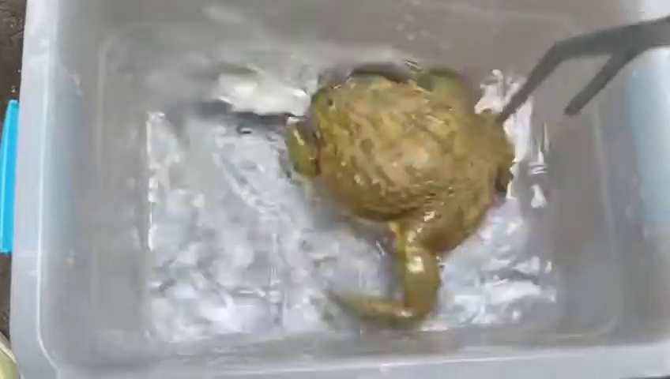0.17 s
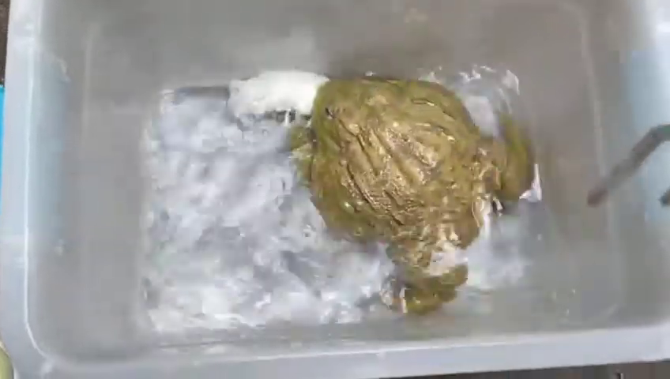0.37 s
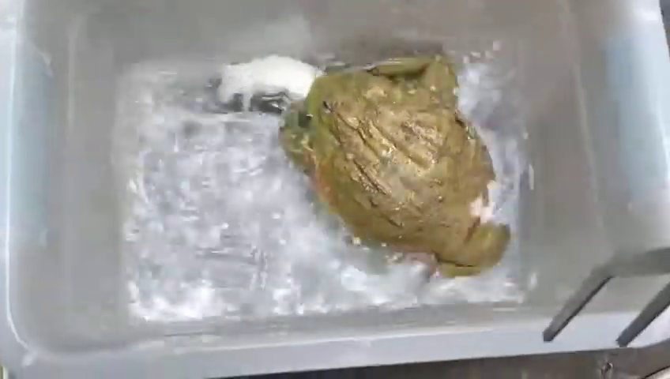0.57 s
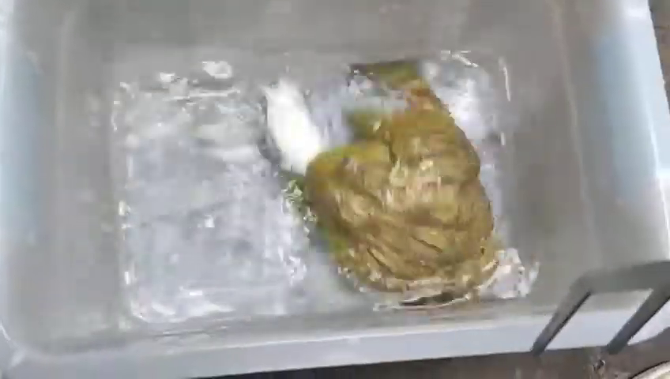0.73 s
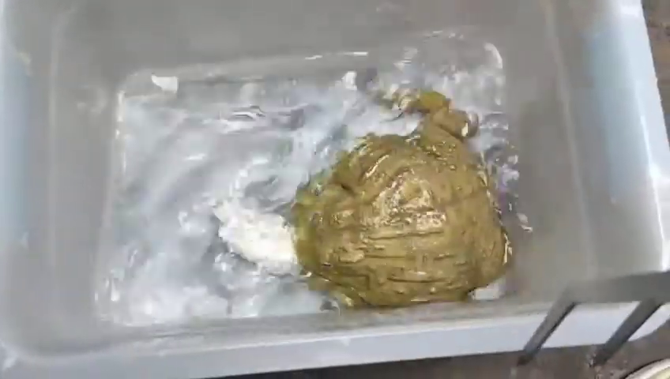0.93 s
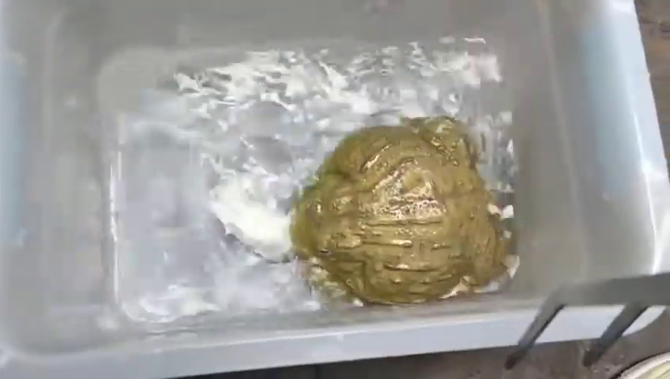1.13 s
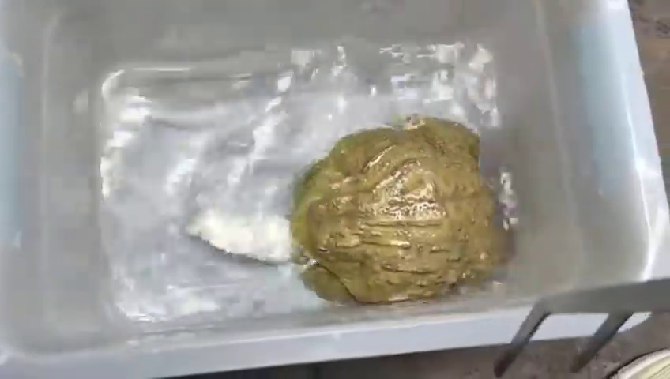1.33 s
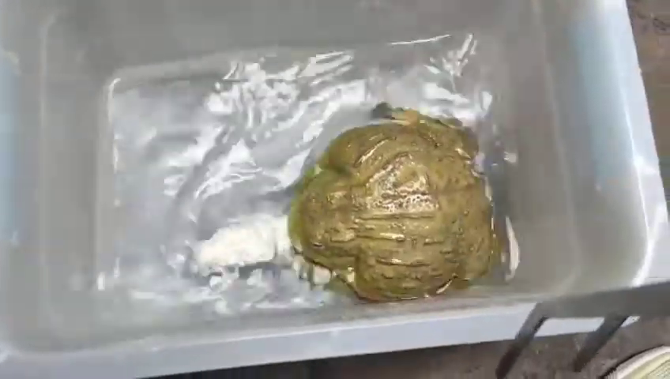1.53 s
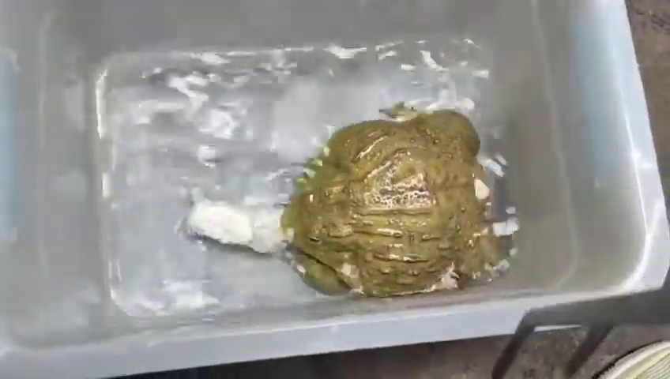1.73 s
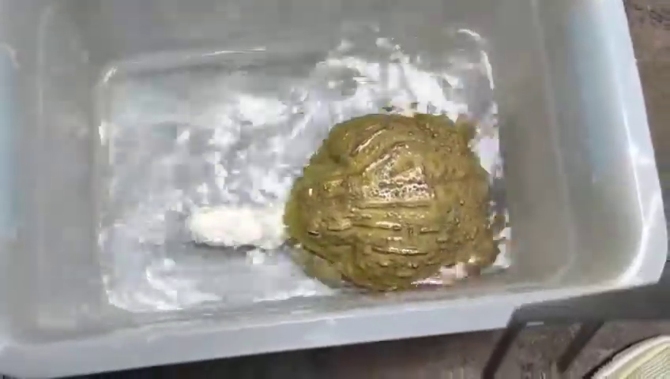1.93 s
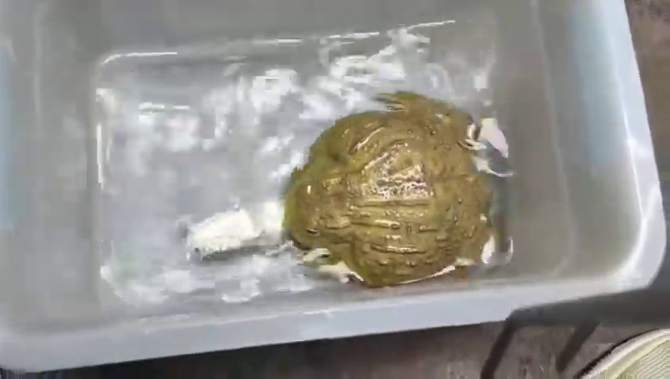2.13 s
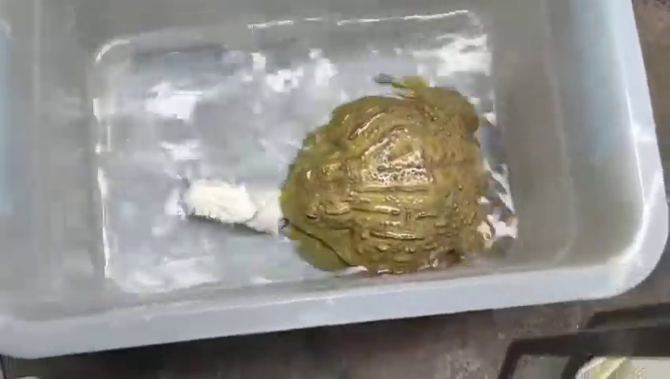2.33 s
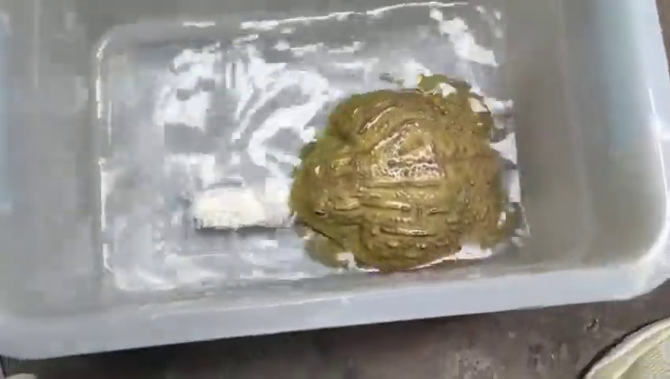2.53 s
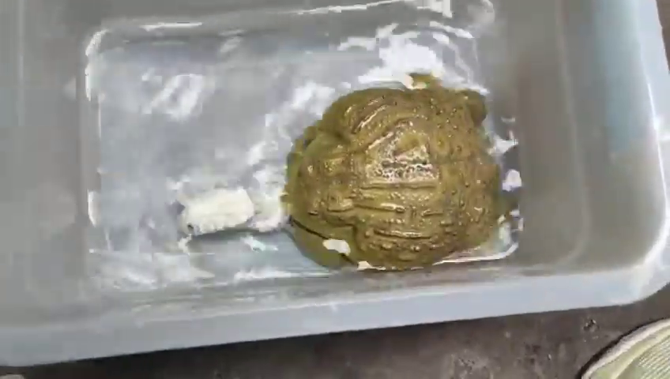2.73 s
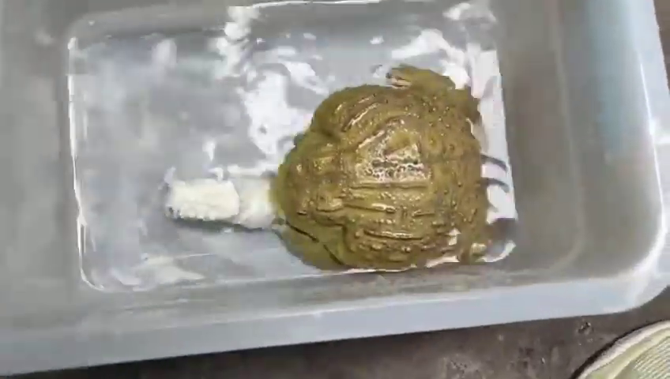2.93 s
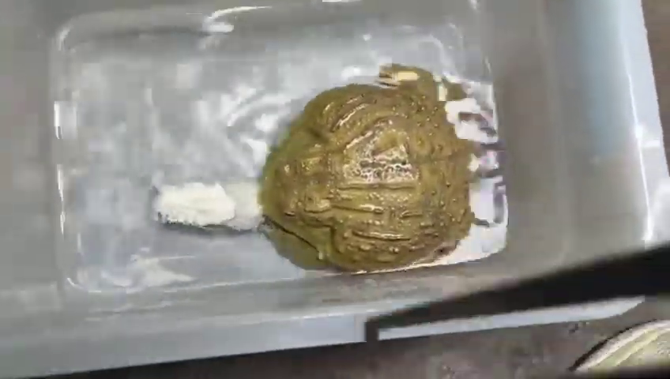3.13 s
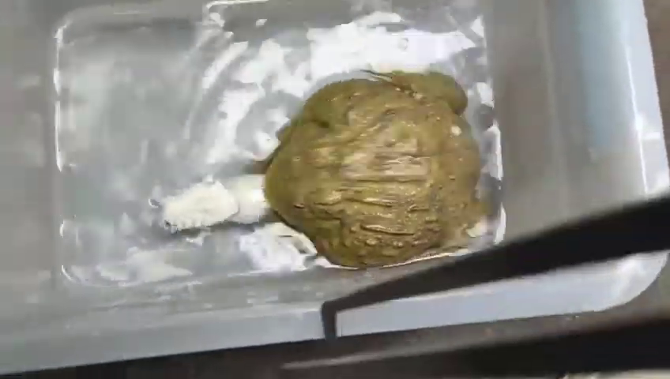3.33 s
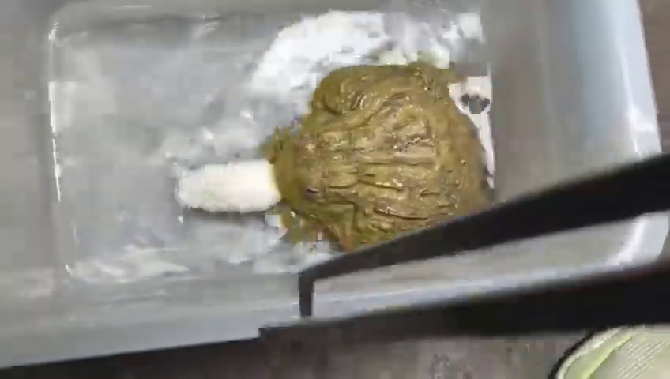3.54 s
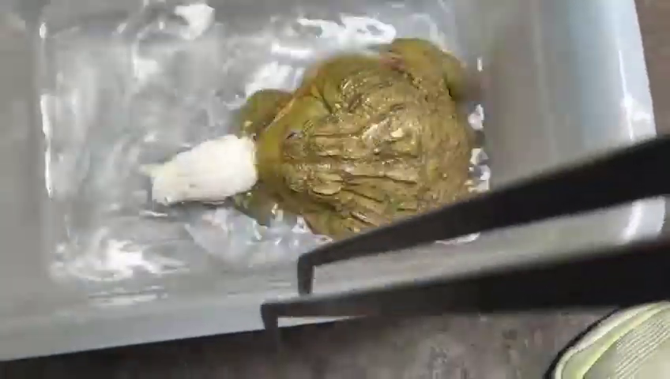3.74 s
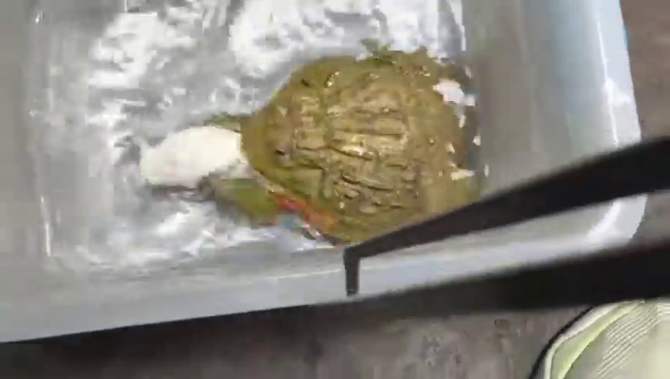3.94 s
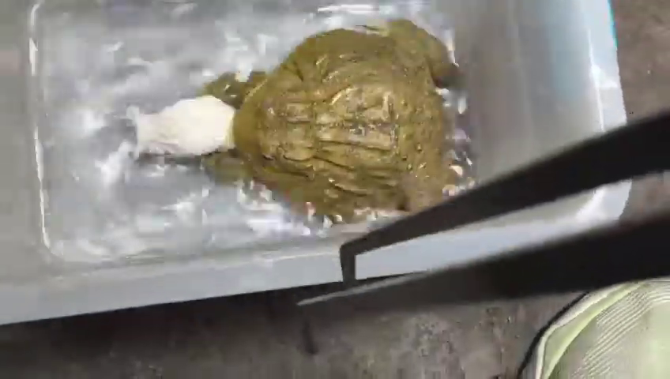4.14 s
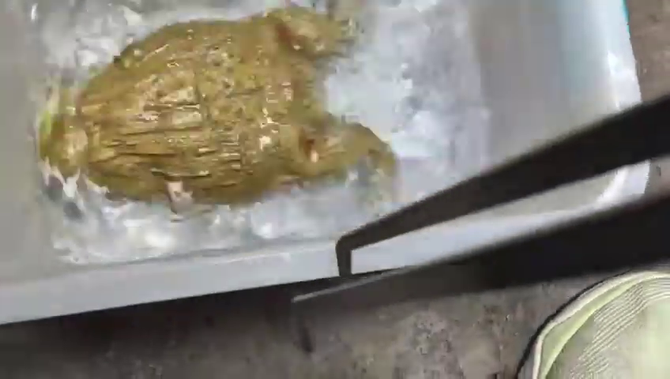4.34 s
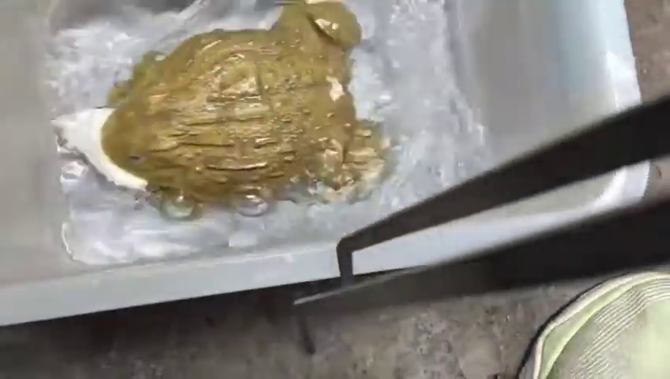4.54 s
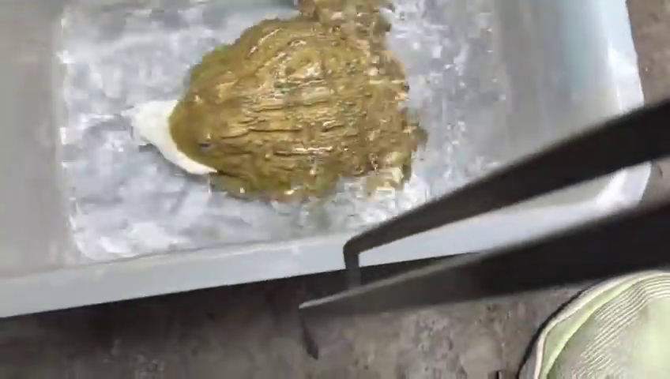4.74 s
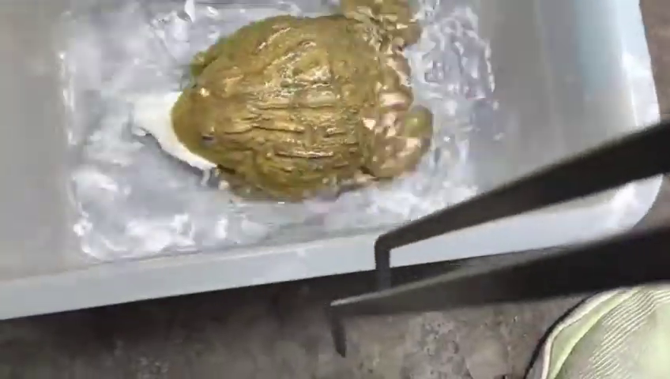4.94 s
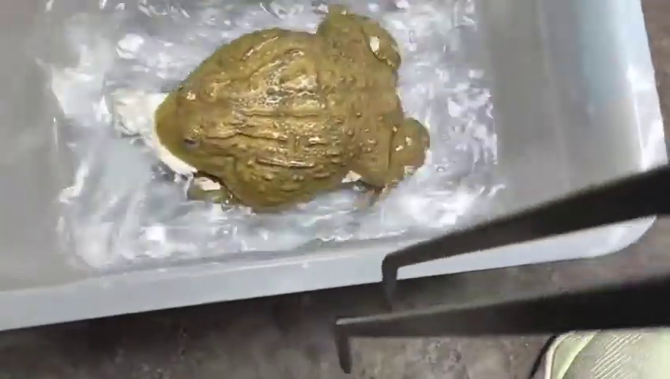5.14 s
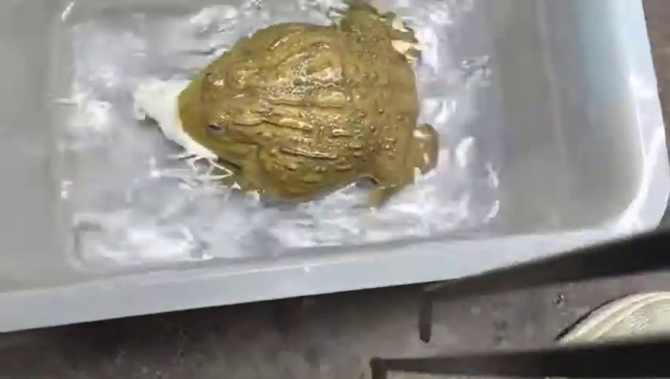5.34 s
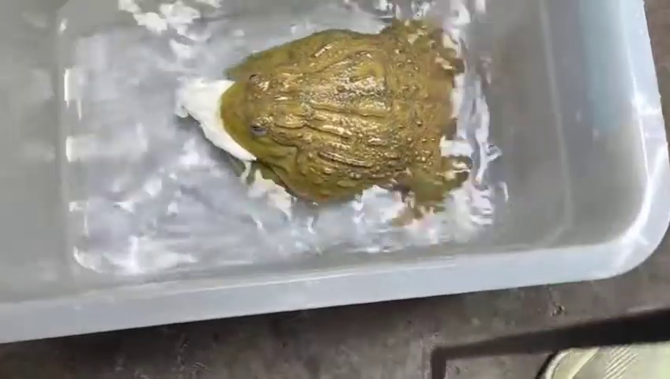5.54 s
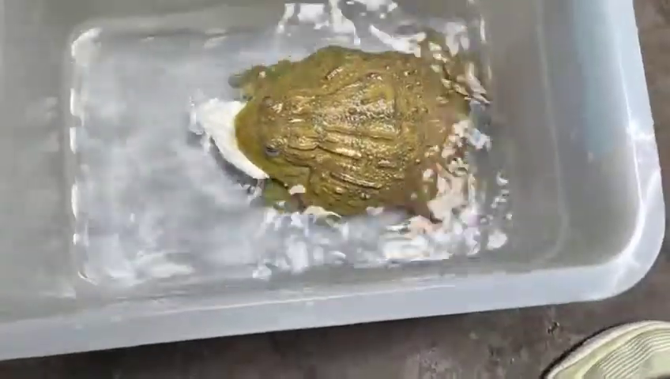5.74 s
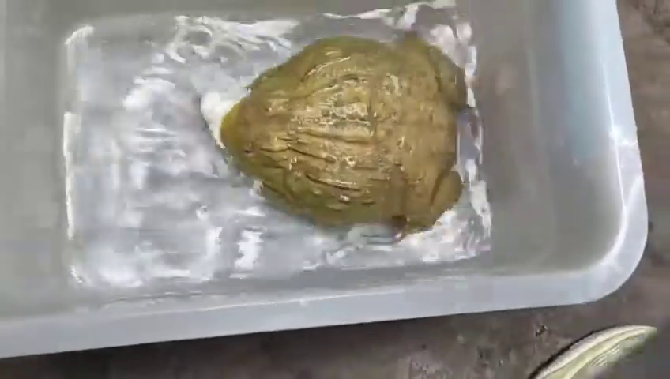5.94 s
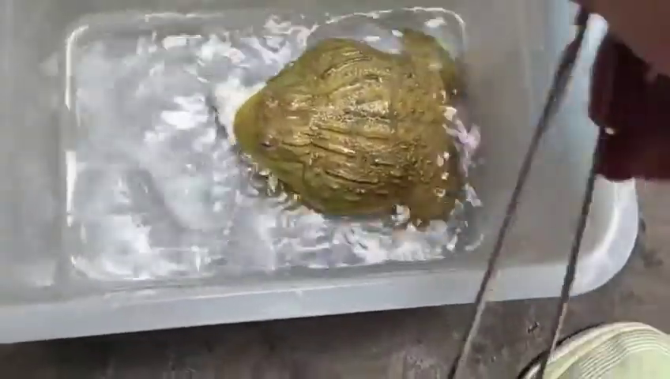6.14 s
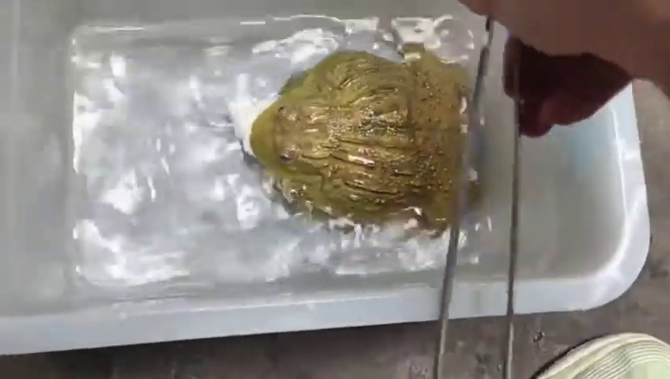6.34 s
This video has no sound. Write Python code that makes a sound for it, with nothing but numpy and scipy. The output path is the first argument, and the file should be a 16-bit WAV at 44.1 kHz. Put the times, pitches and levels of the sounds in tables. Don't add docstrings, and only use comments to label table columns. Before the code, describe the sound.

Close wet slaps, spray and bubbling plops in a plastic tub, a near-silent lull, then one hard splashing snap and scattered drips.

```python
import sys
import numpy as np
from scipy import signal
from scipy.fft import rfft, irfft, next_fast_len
from scipy.io import wavfile
from scipy.ndimage import uniform_filter1d, minimum_filter1d, map_coordinates

SR = 44100
rng = np.random.default_rng(int(sys.argv[2]) if len(sys.argv) > 2 else 0)


def field_ratio(decibels):
    return 10 ** (np.asarray(decibels, dtype=float) / 20)


def master(y):
    cut = np.clip(np.atleast_2d(y).T, -1, 1)
    pcm = np.round(cut * 32767)
    wavfile.write(sys.argv[1], SR, pcm.astype(np.int16))


N = 286209

# start in seconds, hold in seconds, level in dB,
# fine mist relative to it in dB.
SPLASHES = [(.117, 0.14, -52.5, -5), (.3, 0.065, -45, -3.5), (.36, 0.1, -54, 3), (.44, 0.13, -54.5, -6),
            (.53, 0.034, -80, -4), (.6, 0.11, -66.5, 3), (.642, 0.0079, -54.5, -11),
            (.72, 0.041, -75.5, 16.5), (.848, 0.076, -58.5, -4), (2.943, 0.0097, -55.5, -14),
            (3.113, 0.02, -68, 12.5), (3.159, 0.0093, -41, 3.5), (3.175, 0.045, -47.5, 0),
            (3.232, 0.015, -50.5, 2), (3.327, 0.011, -39, -10.5), (3.35, 0.063, -58.5, -9),
            (3.732, 0.036, -56, -8), (4.25, .05, -63, -23), (4.305, 0.02, -47.5, -20),
            (4.33, 0.015, -37.5, -4.5), (4.37, 0.016, -43, -3), (4.395, 0.028, -39, -6),
            (4.462, 0.023, -40, -1), (4.51, 0.13, -41.5, -6.5), (4.655, 0.1, -54.5, 2),
            (4.86, 0.06, -55, -0.5), (4.95, 0.12, -72.5, 13), (5.11, 0.095, -66, 0.5),
            (5.25, 0.024, -56.5, -7.5), (5.94, 0.036, -51, -2.5), (6.01, 0.087, -52.5, 1),
            (6.085, 0.094, -59.5, -6), (6.18, 0.055, -54.5, 0)]
# start in seconds, hold in seconds, level in dB,
# rub on the tub wall relative to it in dB.
WAVES = [(.117, 0.092, -61, 4.5), (.292, 0.036, -46, -2), (.335, 0.091, -56, -4.5), (.65, 0.028, -61, -11),
         (.71, 0.0092, -83.5, 28.5), (.79, 0.067, -68.5, 13.5), (.855, 0.0093, -51.5, -9),
         (1.17, 0.017, -67, -9), (3.328, 0.021, -49, 1), (3.345, 0.02, -64.5, 14.5),
         (4.33, 0.015, -45, 3.5), (4.37, 0.061, -42, 1), (4.46, 0.028, -36, -23), (4.505, 0.028, -49, 10),
         (4.55, 0.081, -39, -6.5), (4.66, 0.017, -56, -21), (4.72, 0.056, -51.5, -7),
         (4.85, 0.17, -83.5, 20.5), (5.22, 0.11, -70.5, 7.5), (5.94, 0.016, -50.5, -7),
         (5.98, 0.13, -59.5, 3.5), (6.1, 0.35, -69.5, 9)]
# time in seconds, level in dB.
RIPPLES = [(0, -67.5), (.3, -63.5), (1.1, -63), (1.4, -70), (1.62, -68.5), (1.85, -75.5), (2.7, -76),
           (3.1, -68), (3.5, -67.5), (4.2, -77.5), (4.8, -57.5), (5.1, -67), (5.35, -75), (5.9, -70),
           (6.3, -68), (6.49, -69)]
# frequency in Hz, density in dB per Hz.
SPRAY_COLOUR = [(1060, -14), (1800, -8.5), (2090, -0.5), (2540, -0.5), (3020, -0.5), (3950, 4), (5570, 4),
                (8000, -3), (10400, -66), (17600, -120)]
# frequency in Hz, density in dB per Hz.
MIST_COLOUR = [(3820, -48), (6500, 0), (9640, 4.5), (11800, 3.5), (14400, 4.5), (15900, -12.5),
               (16500, -33)]
# frequency in Hz, density in dB per Hz.
SLOSH_COLOUR = [(350, -7), (600, -8.5), (714, -12), (1470, -8), (2100, -9), (2800, -2.5), (3640, -5.5),
                (6160, -120)]
# frequency in Hz, density in dB per Hz.
WALL_COLOUR = [(47, -63), (80, -5), (311, 3.5), (713, -8.5), (800, -8.5), (1040, -23), (1760, -120)]
RIPPLE_MIST_DB, RIPPLE_SLOSH_DB = -7, -13
WALL_REST_DB = -67
SPRAY_RISE_DB_S, SPRAY_FALL_DB_S = 2198, 551
WAVE_RISE_DB_S, WAVE_FALL_DB_S = 1204, 453

# time in seconds, peak in dB,
# centre in Hz, treble in dB.
DROPS = [(0.026, -35.5, 8550, -37), (0.117, -32.5, 3950, -6.5), (.1575, -25.5, 4170, -40),
         (0.2012, -26, 4760, -10), (0.2315, -23, 2900, -35), (.296, -45, 3450, -27),
         (0.3088, -23.5, 3350, -7.5), (.318, -22, 6300, -8), (.358, -18, 6940, -11),
         (0.365, -21.5, 6900, -5), (0.4445, -27.5, 4200, -2), (.466, -31, 7200, -8),
         (.5576, -26.5, 3750, -20), (0.673, -32, 4970, -11), (.699, -35, 6040, -8),
         (0.7404, -27.5, 6200, -18), (0.758, -23.5, 4600, -13.5), (0.8205, -30.5, 4900, -18),
         (0.873, -35.5, 6600, -5.5), (.921, -30, 5660, -14), (.948, -33.5, 2690, -9),
         (1.0026, -45, 7040, -3), (1.035, -29.5, 3950, -14), (1.068, -32.5, 4670, -3.5),
         (1.132, -32, 7250, -29), (1.176, -33.5, 6470, -6), (1.24, -44.5, 7500, -22),
         (1.269, -39, 7850, -12), (1.29, -45.5, 6550, -2), (1.497, -44, 6700, -15),
         (3.1584, -20, 4630, -14), (3.1645, -19, 4800, -10), (3.231, -33, 3940, -2),
               (3.322, -14.5, 4700, -22), (3.745, -32.5, 5500, -5.5), (4.022, -42, 3200, -16),
               (4.3267, -9.5, 4330, -20), (4.3311, -21, 3480, -28), (4.3872, -42.5, 3400, 15.5),
               (4.446, -27.5, 3620, -3), (4.454, -23.5, 7000, -3.5), (4.502, -25, 4700, -6),
               (4.5555, -21.5, 2900, -8), (4.575, -17, 4200, -15.5), (4.6043, -14, 4560, -14),
               (4.6907, -23.5, 3200, -7.5), (4.694, -23.5, 7000, -7), (4.705, -37, 4300, -7),
               (4.8585, -37, 3700, -8), (4.891, -19.5, 6640, -18), (4.9166, -26, 4400, -27),
               (4.984, -49, 8050, 12.5), (5.012, -39.5, 4020, -2), (5.031, -36, 6650, -13),
               (5.058, -40.5, 6360, -1), (5.267, -40.5, 5130, -5), (5.317, -50.5, 7550, 2),
               (5.4303, -60, 9000, 5), (5.997, -23, 5570, -3.5), (6.0714, -20.5, 6600, -9.5),
               (6.4864, -39, 3000, -11)]
# time in seconds, peak in dB,
# centre in Hz, treble in dB.
DRIPS = [(.1416, -33, 3700, -21), (.1684, -37, 3890, -30), (.181, -40, 5000, -16),
         (.3504, -33, 6260, -31), (.393, -41, 2800, -22), (.4074, -32, 4090, -25),
         (.4302, -36, 5900, -14.5), (.4873, -34, 5500, -18), (.5262, -52, 3820, -18),
         (.5704, -39, 6000, -3), (.6045, -31, 2740, -16), (.6234, -39, 4500, -14.5),
         (.6783, -35, 4860, -14), (.7474, -58, 4020, -10), (.8107, -36, 9000, -20),
         (.8515, -40, 13000, -8), (.9057, -49, 7000, -16), (.989, -42, 6000, -9),
         (1.068, -34, 1870, -36), (1.109, -46, 6140, -27), (1.1824, -40, 6000, -5),
         (1.257, -46, 11000, -23), (1.2835, -39, 14300, -20), (1.3126, -46, 4810, -6),
         (1.3624, -65, 5020, -8), (1.3784, -56, 6340, -6.5), (1.4212, -57, 4800, -2),
         (1.5444, -56, 7370, -5), (1.5519, -53, 6600, 1), (1.5934, -61, 9000, -8),
         (1.7226, -58, 11000, -12), (1.778, -48, 4900, -17),
         (3.321, -29, 1560, -47), (3.7778, -37, 7060, -32), (4.0234, -44, 1610, -40),
               (4.38, -26, 4500, -5.5), (4.3877, -32, 7000, -5), (4.4268, -39, 2840, -12),
               (4.5437, -33, 4970, -5), (4.5948, -24, 9900, -12), (4.6104, -23, 4540, -11),
               (4.6725, -34, 7430, -28), (4.7293, -30.5, 7200, -12), (4.8426, -46, 3520, -2),
               (4.876, -38, 4700, -5), (4.9354, -39, 13100, -16), (4.9954, -35, 11400, -19),
               (5.116, -40, 5320, -23), (5.171, -41, 10900, -11), (5.2114, -46, 8000, -9),
               (5.2282, -52, 6950, -12), (5.243, -57, 9040, -12), (5.2617, -44, 4700, -12),
               (5.285, -51, 4480, -14), (5.4498, -51, 5500, -8), (5.4914, -60, 4440, -15),
               (5.686, -54.5, 9000, -7.5), (5.945, -41, 5040, -9), (5.961, -34, 2820, -10),
               (5.996, -31, 1600, -40), (6.2964, -50, 7000, -13), (6.405, -42, 3380, -33),
               (5.085, -54, 9000, -6), (5.645, -57, 7000, -4.5), (5.701, -51.5, 7500, -20)]
DROP_S, TICK_SHARE = 0.0064, 0.5

# time in seconds, peak in dB, pitch in Hz.
SNAPS = [(.1585, -28, 4100), (0.2013, -19.5, 4540), (0.4437, -24.5, 4260), (.7401, -29, 6200),
         (1.0678, -34, 3880), (1.1326, -32, 6850), (3.1604, -23.5, 4300), (3.3223, -23, 4700),
         (3.747, -21.5, 3890), (4.3259, -4.5, 4100), (4.3274, -5, 3580), (4.3286, -11.5, 4080),
         (4.3294, -10.5, 3060), (4.5755, -28, 4260), (4.6111, -15, 6700), (4.8912, -22, 6400),
         (5.9969, -19, 5270)]
SNAP_RISE_CYCLES, SNAP_LIFE_CYCLES = 0.82, 1.9

# time in seconds, peak in dB, pitch in
# Hz, t60 in seconds.
BUBBLES = [(0.014, -45.5, 1147, 0.034), (0.219, -43, 954, 0.11), (.264, -35, 1560, 0.022),
           (0.294, -40, 1580, 0.08), (0.325, -26, 1344, 0.082), (.361, -18.5, 2165, 0.029),
           (.366, -23.5, 790, 0.017), (0.443, -36.5, 780, 0.091), (0.473, -42.5, 1050, 0.059),
           (0.641, -41, 1390, 0.035), (0.777, -29.5, 1540, 0.019), (0.819, -37.5, 1120, 0.042),
           (0.861, -37.5, 1116, 0.064), (1.642, -34.5, 1146, 0.024), (3.321, -31.5, 806, 0.063),
           (3.405, -42, 1074, 0.065), (4.022, -38, 765, 0.045), (4.399, -27, 1444, 0.067),
           (4.465, -19.5, 1530, 0.037), (4.574, -37, 616, 0.093), (4.612, -26, 848, 0.072),
           (4.626, -20.5, 1314, 0.046), (4.704, -40, 840, 0.068), (4.729, -29.5, 800, 0.054),
           (5.163, -36, 1123, 0.045), (5.195, -40, 1420, 0.047), (5.252, -38.5, 1876, 0.051),
           (5.263, -38, 2510, 0.027), (5.944, -45, 1540, 0.062), (6.03, -32.5, 1162, 0.084),
           (6.042, -32, 1237, 0.05), (6.083, -32.5, 2247, 0.047), (6.15, -45, 1645, 0.12),
           (6.324, -49.5, 1600, 0.044),
           (.1575, -39, 4000, 0.047), (.234, -37.5, 2600, 0.086), (0.4703, -32.5, 2660, 0.051),
         (.556, -32, 3550, 0.025), (1.179, -55, 2030, 0.034), (0.599, -17.5, 2770, 0.017),
         (4.4773, -27, 2570, 0.045), (4.5544, -23.5, 2610, 0.064), (4.688, -25, 2840, 0.023),
         (4.721, -32, 2700, 0.075), (6.022, -29.5, 3330, 0.03), (6.042, -23, 2837, 0.024),
         (6.0468, -23.5, 3055, 0.029)]
BUBBLE_RISE_HZ = 139.5
# time in seconds, peak in dB, pitch in Hz, life in seconds.
CHIRPS = [(0.85, -39, 1256, 0.011), (.862, -41, 1400, 0.011), (4.621, -31.5, 1690, 0.011),
          (5.944, -47, 1514, 0.0088), (5.951, -43, 1095, 0.013), (5.962, -51, 1500, 0.0083),
          (6.013, -44, 2670, .01), (6.051, -30, 2690, 0.011), (6.084, -44, 2750, 0.0075),
          (6.145, -36, 1590, 0.0083), (1.178, -48, 1686, .02)]
CHIRP_SWEEP = .28

# time in seconds, peak in dB, pitch in Hz, t60 in seconds.
KNOCKS = [(0.295, -37, 139, 0.19), (0.704, -38.5, 129.5, 0.11), (0.822, -53, 246, 0.099),
          (0.856, -41.5, 435, 0.11), (1.003, -31.5, 486, 0.066), (1.004, -51, 686, 0.026),
          (1.006, -39, 288, 0.048), (1.633, -44.5, 232, 0.11), (3.323, -33, 323, 0.11),
          (3.324, -34, 502, 0.11), (3.4, -41, 212, 0.093), (3.691, -45.5, 447, 0.089),
          (3.841, -42.5, 468, 0.2), (4.023, -31.5, 447, 0.073), (4.228, -48.5, 417, 0.19),
          (4.325, -27, 381, 0.073), (4.406, -35.5, 378, 0.11), (4.522, -31.5, 328, 0.11),
          (4.569, -26.5, 627, 0.093), (5.164, -36, 253, 0.1), (6.123, -42, 149, 0.19)]
# time in seconds, level in dB, slip rate in Hz,
# floor resonance in Hz.
SQUEAK = [(4.742, -47, 300, 714), (4.747, -33, 321, 786), (4.76, -39, 248.8, 990),
          (4.771, -29, 267.5, 1020), (4.787, -36.5, 261, 880), (4.8, -44.5, 310, 1120),
          (4.815, -42.5, 339, 1370), (4.83, -93, 330, 1400)]
# time in seconds, pitch in Hz, level in dB.
LEAKS = [
    [(1.64, 10040, -78), (1.68, 9930, -79), (1.73, 9700, -85.5), (1.795, 10000, -75.5), (1.86, 9720, -82),
     (1.93, 9720, -85), (1.985, 10000, -82), (2.075, 9760, -81), (2.14, 9000, -89)],
    [(3.78, 10900, -69), (3.815, 11300, -76), (3.845, 11150, -80), (3.88, 10200, -90), (3.92, 9850, -82),
     (3.97, 9500, -82)],
]

# frequency in Hz, t60 in seconds.
ECHO_DECAY = [(200, 0.097), (2000, 0.28), (12000, 0.0069)]
# frequency in Hz, density in dB per Hz.
HUSH_COLOUR = [(12, -39), (20, -4), (121, -2.5), (160, -14), (323, -10.5), (521, -31.5), (566, -17.5),
               (1180, -28), (1790, -28), (5360, -38), (7730, -37), (8650, -59.5), (9950, -65.5),
               (15200, -42), (16500, -56)]
# time in seconds, level in dB.
HUSH_LEVEL = [(0.0, -64), (0.12, -64.5), (6.49, -59)]


def unit(x):
    return x / np.sqrt(np.mean(x ** 2) + 1e-20)


def along(points, hz):
    f, value = np.transpose(points)
    return np.interp(np.log(hz + 1), np.log(f + 1), value)


def curves(rows):
    s, *columns = np.transpose(rows)
    return [np.interp(np.arange(N) / SR, s, column) for column in columns]


def coloured(x, spectrum):
    m = next_fast_len(len(x) + 8192)
    gain = field_ratio(along(spectrum, np.fft.rfftfreq(m, 1 / SR)))
    return unit(irfft(rfft(x, m) * gain, m)[:len(x)])


def patchy(patchy_db, wide, long):
    z = signal.stft(rng.standard_normal(N + 512), nperseg=256)[2]
    field = uniform_filter1d(rng.standard_normal(z.shape), wide, 0)
    field = uniform_filter1d(field, long, 1)
    return signal.istft(z * field_ratio(patchy_db * unit(field)), nperseg=256)[1][:N]


def add(track, s, sound):
    part = track[max(round(s * SR), 0):][:len(sound)]
    part += sound[:len(part)]


def grains(count, size, centre_hz, spread, cycles, spiky_db):
    when = rng.random((count, 1))
    detune = rng.standard_normal((count, 1))
    loudness = rng.exponential(size=(count, 1))
    hz = np.clip(centre_hz * np.exp(spread * detune), 100, 15000)
    turns = hz * np.arange(size) / SR
    ring = np.exp(-turns / cycles) * np.sin(2 * np.pi * turns * (1 + 0.006 * turns))
    wave = field_ratio(spiky_db * loudness) * ring * np.hanning(2 * size)[size:]
    at = (when * N).astype(int) + np.arange(size)
    return unit(np.bincount(at.ravel(), wave.ravel(), N + size)[:N])


def surges(rows, rise_db_s, fall_db_s):
    s, hold, db, over_db = np.transpose(rows)[:, :, None]
    t = np.arange(0, N + 32, 32) / SR
    before = np.clip(s - t, 0, 1)
    after = np.clip(t - s - hold, 0, 1)
    shape = field_ratio(db - rise_db_s * before - fall_db_s * after)
    layers = (shape, shape * field_ratio(over_db))
    return [np.interp(np.arange(N) / SR, t, np.linalg.norm(g, axis=0)) for g in layers]


def water():
    ripple = field_ratio(curves(RIPPLES)[0])
    spray, mist = surges(SPLASHES, SPRAY_RISE_DB_S, SPRAY_FALL_DB_S)
    wave, rub = surges(WAVES, WAVE_RISE_DB_S, WAVE_FALL_DB_S)
    fizz = grains(count=5000, size=330, centre_hz=4500, spread=.55, cycles=7, spiky_db=1.1)
    crackle = grains(count=4000, size=60, centre_hz=4000, spread=.5, cycles=1.5, spiky_db=2.2)
    bright = .4 * fizz + .45 * crackle + .8 * patchy(5, wide=2, long=16)
    gurgle = grains(count=2500, size=600, centre_hz=1500, spread=.5, cycles=5, spiky_db=2.2)
    slosh = coloured(.8 * gurgle + .6 * patchy(4, wide=3, long=7), SLOSH_COLOUR)
    wall = coloured(patchy(3, wide=2, long=7), WALL_COLOUR)
    flicker = map_coordinates(rng.standard_normal(N // 500 + 4), [np.arange(N) / 500])
    bright = bright * field_ratio(1.6 * flicker)
    out = np.hypot(spray, ripple) * coloured(bright, SPRAY_COLOUR)
    out += np.hypot(mist, field_ratio(RIPPLE_MIST_DB) * ripple) * coloured(bright, MIST_COLOUR)
    out += np.hypot(wave, field_ratio(RIPPLE_SLOSH_DB) * ripple) * slosh
    out += np.hypot(rub, field_ratio(WALL_REST_DB)) * wall
    return out


def drops(rows):
    out, t = np.zeros(N), np.arange(SR // 20) / SR
    f = np.fft.rfftfreq(len(t), 1 / SR)
    u = t / DROP_S
    swell = (1 - np.exp(-(t / 0.0014) ** 2)) * np.exp(-(1.614 * u) ** 2)
    tick_fade = np.exp(-(u / TICK_SHARE) ** 2)
    tick_band = 1 / (1 + (7000 / (f + 1)) ** 3.9) / (1 + (f / 15000) ** 4)
    for s, db, hz, treble_db in rows:
        noise = rfft(rng.standard_normal((2, len(t))))
        crater_band = 0.012 * (f < hz) + 1 / (1 + ((f - hz) / (0.16 * hz)) ** 2)
        crater = unit(irfft(noise[0] * crater_band, len(t)))
        tick = unit(irfft(noise[1] * tick_band, len(t)))
        spatter = crater + field_ratio(treble_db + 12.5) * tick * tick_fade
        add(out, s - .0012, field_ratio(db - 8.5) * swell * spatter)
    return out


def snaps():
    out, t = np.zeros(N), np.arange(SR // 100) / SR
    for s, db, hz in SNAPS:
        turns = hz * t
        swell = (1 - np.exp(-(turns / SNAP_RISE_CYCLES) ** 2)) * np.exp(-turns / SNAP_LIFE_CYCLES)
        add(out, s, field_ratio(db + 3) * swell * np.sin(2 * np.pi * turns))
    return out


def bubbles():
    out, t = np.zeros(N), np.arange(SR // 8) / SR
    for s, db, hz, t60 in BUBBLES:
        turns = t * (.95 * hz + BUBBLE_RISE_HZ * t / t60)
        shake = unit(uniform_filter1d(rng.standard_normal(len(t)), size=120))
        flutter = 1 + .65 * shake
        turns = turns + .05 * shake[::-1]
        swell = field_ratio(db - 3 - 60 * t / t60) * (1 - np.exp(-t / 0.0025))
        add(out, s - .002, swell * flutter * np.sin(2 * np.pi * turns))
    return out


def chirps():
    out, t = np.zeros(N), np.arange(SR // 20) / SR
    for s, db, hz, life in CHIRPS:
        u = t / life
        swell = 2 * u * np.exp(-2.6 * u)
        note = np.sin(2 * np.pi * hz * t * (1 + CHIRP_SWEEP * u / 2))
        add(out, s - .002, field_ratio(db + 3.5) * swell * note)
    return out


def knocks():
    out, t = np.zeros(N), np.arange(SR // 6) / SR
    f = np.fft.rfftfreq(len(t), 1 / SR)
    for s, db, hz, t60 in KNOCKS:
        puff_band = 1 / (1 + ((f - hz) / (0.35 * hz)) ** 2)
        puff = unit(irfft(rfft(rng.standard_normal(len(t))) * puff_band, len(t)))
        note = np.sin(2 * np.pi * hz * t * (1.04 - 2.76 * t))
        swell = field_ratio(db - 1.5 - 60 * t / max(t60, .03)) * (1 - np.exp(-t / 0.0048))
        add(out, s - .003, swell * (note + 0.61 * puff))
    return out


def squeak():
    db, hz, floor_hz = curves(SQUEAK)
    now = slice(round(SQUEAK[0][0] * SR), round(SQUEAK[-1][0] * SR))
    k = np.arange(1, 8)[:, None]
    jitter = 1 + 0.021 * unit(uniform_filter1d(rng.standard_normal(N), size=200))
    phase = 2 * np.pi * np.cumsum((hz * jitter)[now]) / SR
    overtone_hz = k * hz[now]
    off_hz = overtone_hz - floor_hz[now]
    gain = 1.02 / k ** 2.9 * (overtone_hz < 1700) + 1.21 / (1 + (off_hz / 180) ** 2)
    lag = 1.9 * np.arctan(off_hz / 200)
    out = np.zeros(N)
    out[now] = field_ratio(db[now]) * (gain * np.cos(k * phase - lag)).sum(axis=0)
    return out


def leaks():
    out = np.zeros(N)
    for rows in LEAKS:
        hz, db = curves(rows)
        now = slice(round(rows[0][0] * SR), round(rows[-1][0] * SR))
        drift = 1 + 0.0012 * unit(uniform_filter1d(rng.standard_normal(N), size=300))
        fade = signal.windows.tukey(len(hz[now]), .1)
        whistle = np.sin(2 * np.pi * np.cumsum((hz * drift)[now]) / SR)
        out[now] = np.sqrt(2) * field_ratio(db[now]) * fade * whistle
    return out


def echo(x):
    hz, t, z = signal.stft(rng.standard_normal(SR // 3), SR, nperseg=256)
    decay = field_ratio(-60 * t / along(ECHO_DECAY, hz)[:, None])
    tail = signal.istft(z * decay, SR, nperseg=256)[1]
    return signal.fftconvolve(np.pad(x, (90, 0)), tail / np.linalg.norm(tail))[:N]


def hush():
    return field_ratio(curves(HUSH_LEVEL)[0] + 4) * coloured(patchy(1.5, wide=4, long=30), HUSH_COLOUR)


def scene():
    slaps = drops(DROPS) + snaps()
    pockets = bubbles() + chirps()
    hits = slaps + pockets + knocks() + squeak() + leaks()
    wet = field_ratio(-15) * echo(hits)
    drips = drops(DRIPS)
    return (hits + wet + water() + hush() + drips)[None]


def holes_by_attacks(x, attack_db, keep_db, from_hz):
    f, _, z = signal.stft(x, SR, nperseg=256)
    power = np.abs(z) ** 2 + 1e-16
    treble_db = 10 * np.log10(power[..., f > 5000, :].sum(axis=-2, keepdims=True))
    jump = treble_db[..., 2:] - treble_db[..., :-2] > attack_db
    jump = np.pad(1. * jump, ((0, 0), (0, 0), (2, 0)))
    near = uniform_filter1d(jump, size=15, axis=-1) > 1e-3
    cell_db = 10 * np.log10(np.abs(uniform_filter1d(power, size=5, axis=-2)) + 1e-16)
    usual_db = uniform_filter1d(uniform_filter1d(cell_db, size=18, axis=-2), size=3, axis=-1)
    weak = near & (cell_db < usual_db + keep_db) & (f[:, None] > from_hz)
    return signal.istft(z * np.where(weak, .1, 1), SR, nperseg=256)[1][..., :N]


def masked(x, mask_db, from_hz, window, bins, frames):
    f, _, z = signal.stft(x, SR, nperseg=window)
    power = np.abs(z) ** 2
    around = uniform_filter1d(power, size=bins, axis=-2)
    loudest = -minimum_filter1d(-around, size=frames, axis=-1)
    keep = (power > field_ratio(2 * mask_db) * loudest) | (f[:, None] < from_hz)
    return signal.istft(z * np.where(keep, 1, .15), SR, nperseg=window)[1][..., :N]


def band_limit(x):
    return signal.sosfilt(signal.butter(12, 16970, fs=SR, output="sos"), x)


def record(dry):
    f = np.fft.rfftfreq(N, 1 / SR)
    narrow = irfft(rfft(dry) * np.where(f < 15800, 1, field_ratio(-20.5)), N)
    return band_limit(narrow)


dry = scene()
out = record(dry)
master(out)
```